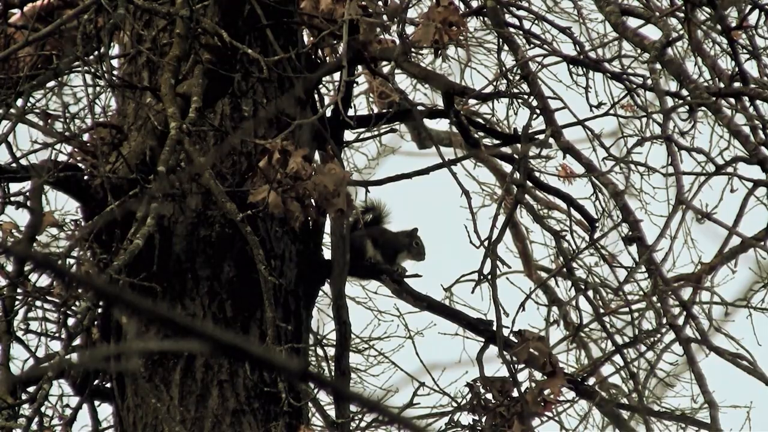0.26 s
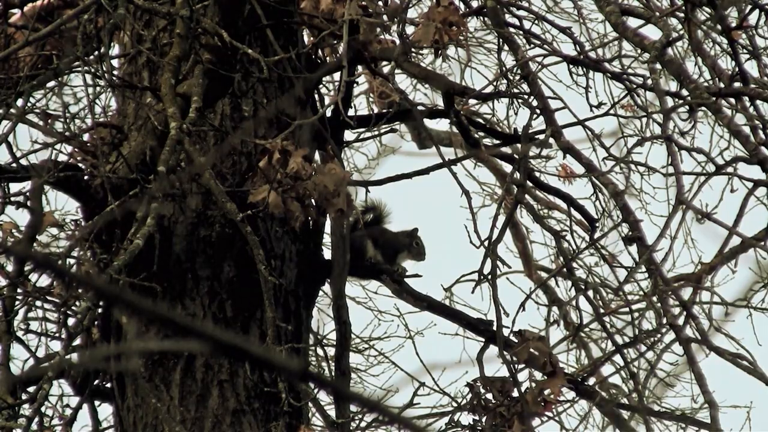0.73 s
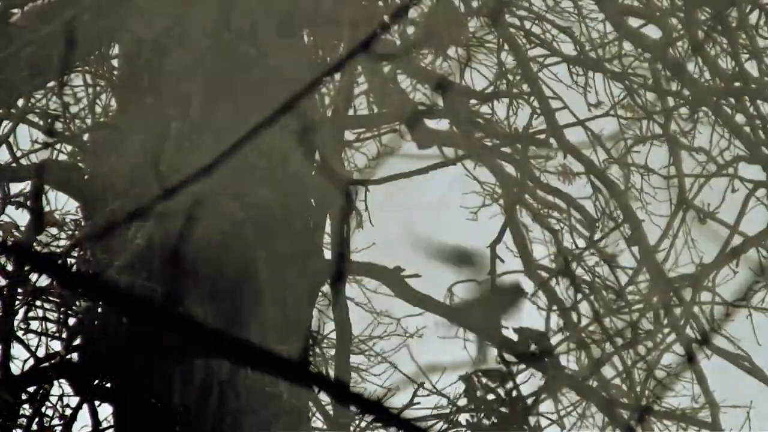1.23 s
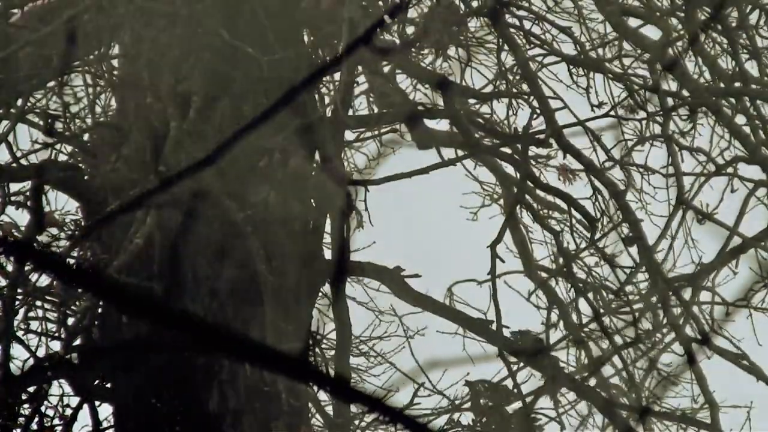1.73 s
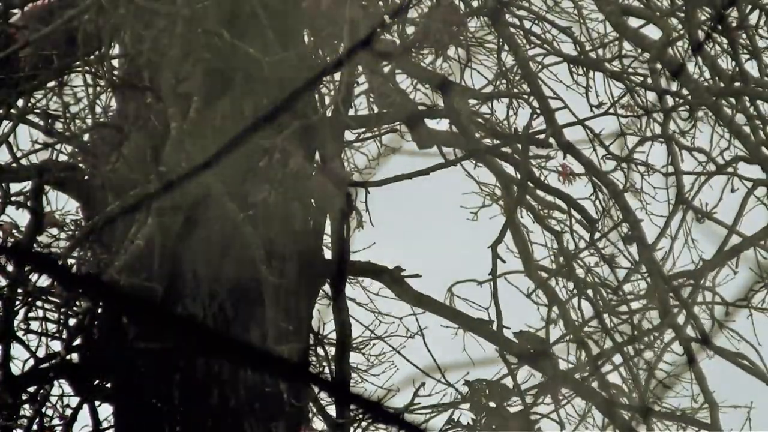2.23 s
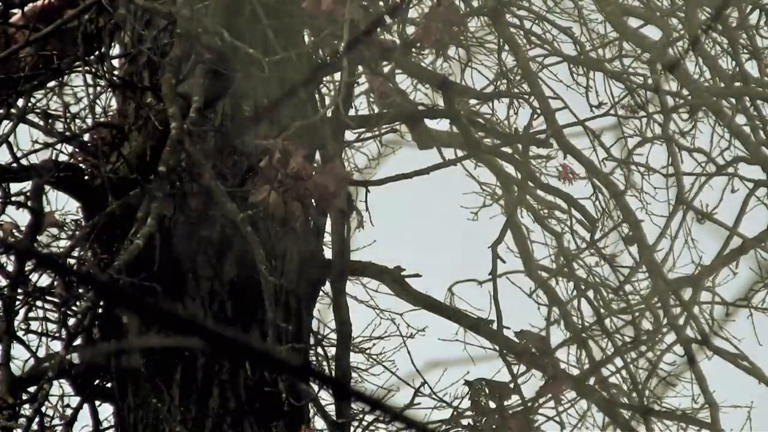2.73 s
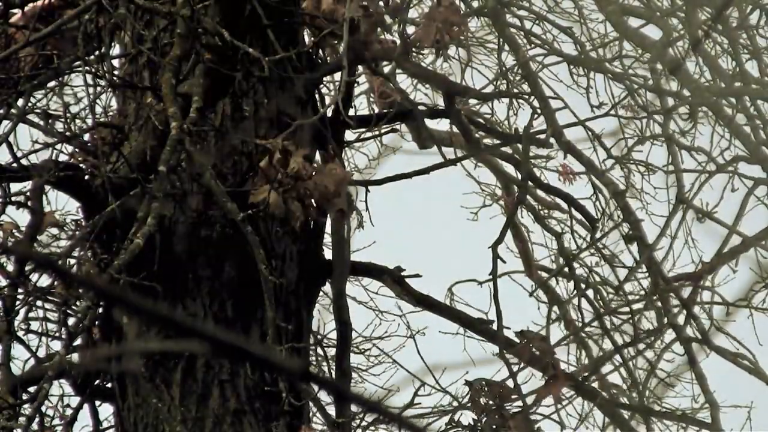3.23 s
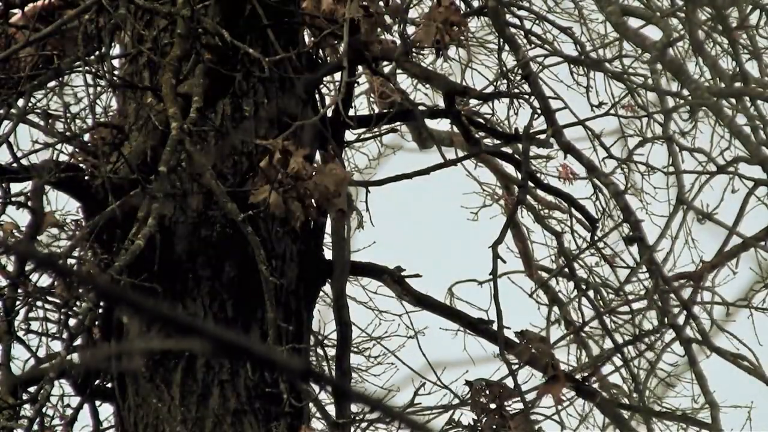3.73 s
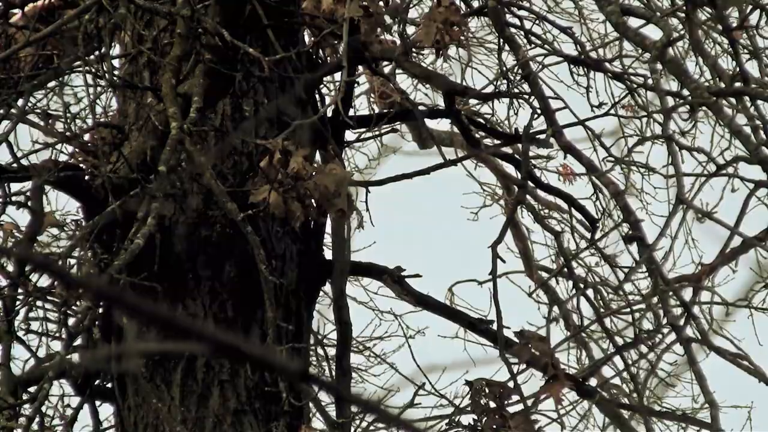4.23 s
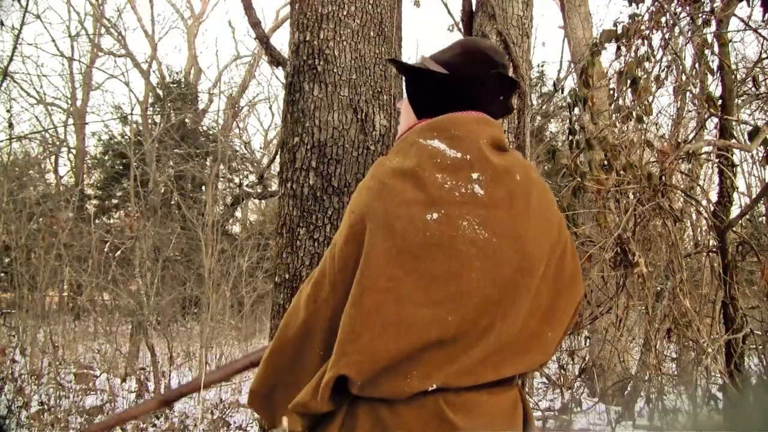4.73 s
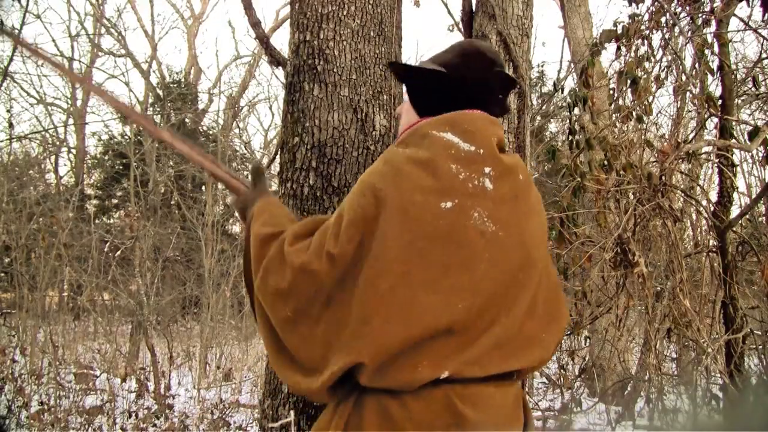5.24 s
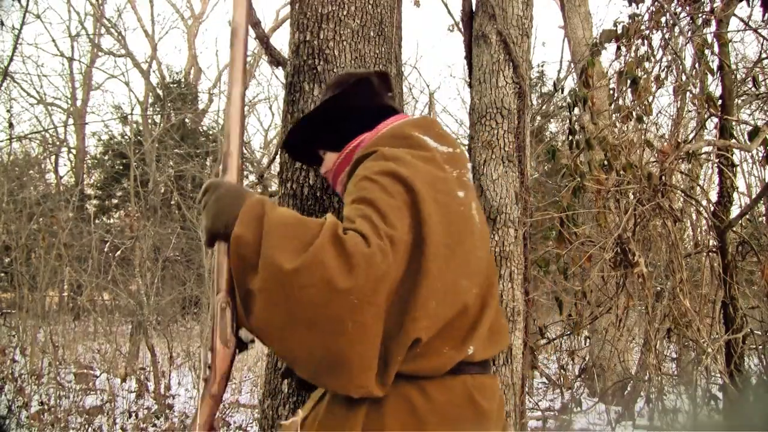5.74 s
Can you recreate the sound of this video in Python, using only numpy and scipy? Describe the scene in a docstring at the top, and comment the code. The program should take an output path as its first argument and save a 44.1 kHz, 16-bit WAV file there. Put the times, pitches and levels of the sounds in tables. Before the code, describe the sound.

Quiet winter woods with a faint low hum. Just before one second a steel flintlock clatters, then a single musket shot cracks, hard enough to overload the close stereo microphone. Trunks throw back quick slaps and a long fading roll. Small bits patter down on leaves and snow, thinning out. Finally the hunter raises the gun: hollow wooden knocks and woollen cloth rubbing.

```python
"""A flintlock musket fires in bare winter woods, heard in stereo from close by.
First there is still air with a wavering hum (shaped noise); then the lock clatters (ringing steel, noise).
The charge bangs (pressure swings and a burst of noise) and trunks send back a long roll (bands of fading ticks).
Shot, bark and twigs patter down on leaves and snow (dense ticks, with single ones standing out).
Later the hunter swings the gun up: the stock knocks (ringing wood), hand and woollen cloak rub (dense ticks)."""
import sys
import numpy as np
from scipy import signal
from scipy.fft import rfft, irfft
from scipy.io import wavfile
from scipy.ndimage import uniform_filter1d

SR = 44100
rng = np.random.default_rng(int(sys.argv[2]) if len(sys.argv) > 2 else 0)


def log_audio(samples):
    """Write samples as a 16-bit WAV file to the path given in sys.argv[1]."""
    # one column per channel
    frames = np.atleast_2d(samples).T
    # limit to full scale, then quantise
    limited = np.clip(frames, -1, 1)
    pcm = np.round(limited * 32767).astype(np.int16)
    wavfile.write(sys.argv[1], SR, pcm)


N = 263686  # length of the scene in samples


def undb(db):
    """Turn dB into a plain gain."""
    return 10 ** (np.asarray(db) / 20)


def unit(x):
    """Scale to an average (RMS) strength of 1."""
    return x / np.sqrt(np.mean(x ** 2))


def peak1(x):
    """Scale to a peak of 1."""
    return x / np.abs(x).max()


def die_away(t, t60):
    """A fade that falls 60 dB in t60 seconds."""
    return np.exp(-np.log(1000) * t / t60)


def at_hz(table, hz):
    """Read a (f/Hz, value) table on a log-frequency axis."""
    f, v = np.transpose(table)
    return np.interp(np.log(hz), np.log(f), v)


def curve(table, off_db=-120):
    """Level column of a (t/s, level/dB) table sample by sample, as good as silent outside it."""
    s, level_db = np.transpose(table)
    return np.interp(np.arange(N) / SR, s, level_db, left=off_db, right=off_db)


def band(x, hz, octaves):
    """Keep only a band of x around hz."""
    edges = hz / 2 ** (octaves / 2), min(hz * 2 ** (octaves / 2), .45 * SR)
    return signal.sosfilt(signal.butter(2, edges, "band", fs=SR, output="sos"), x)


def walk(rate):
    """A random level that glides to a new value rate times a second; spread near 1."""
    k = int(SR / rate)
    steps = np.repeat(rng.standard_normal(N // k + 1), k)
    return unit(uniform_filter1d(steps, k)[:N])


def grains(rate, spread_db):
    """Noise made of separate ticks of unlike sizes, about rate of them a second."""
    hits = rng.random(N) < rate / SR
    sizes = rng.standard_normal(N) * undb(spread_db * rng.exponential(size=N))
    return unit(hits * sizes)


def pair(mid, side, alike):
    """Left and right from two unrelated sounds; likeness 1 is centred, -1 opposed."""
    alike = np.clip(alike, -1, 1)
    return np.sqrt((1 + alike) / 2) * mid + np.sqrt((1 - alike) / 2) * side * np.array([[1], [-1]])


def add(out, s, x, pan_db=0):
    """Mix a short sound in at time s; pan_db is how much louder the left is made."""
    i = int(s * SR)
    x = np.atleast_2d(x)[:, :N - i]
    out[:, i:i + x.shape[1]] += x * undb(np.array([[pan_db], [-pan_db]]) / 2)


def ring(modes, spot_hz, falloff_db, scatter_db, share=0.84, detune=0.01):
    """One blow on a body: notes (modes) far from what the struck spot favours are driven less; peak 1."""
    t = np.arange(SR // 6) / SR
    total = 0
    for hz, db, t60 in modes:
        octaves_away = abs(np.log2(hz / spot_hz))
        gain = undb(db - falloff_db * octaves_away + scatter_db * rng.standard_normal())
        # every mode is detuned a little at random from blow to blow
        shifted_hz = hz * (1 + detune * rng.standard_normal())
        tone = rng.choice([-1, 1]) * np.sin(2 * np.pi * shifted_hz * t)
        total = total + gain * tone * die_away(t, t60 * share)
    return peak1(total)


def fft_hz():
    """Frequencies of the whole scene's spectrum, kept above zero for log reading."""
    return np.maximum(np.fft.rfftfreq(N, 1 / SR), 1)


def colour(x, table):
    """Shape a noise by a (f/Hz, level/dB) table."""
    return unit(irfft(rfft(x) * undb(at_hz(table, fft_hz())), N))


# colour of the quiet woods: (f/Hz, relative level/dB per Hz)
WOODS_COLOUR = [(15, -51), (25, -14.5), (59, -21), (86, -12.5), (164, -13), (193, -11), (260, -9),
                (297, -8.5), (368, -6.5), (523, -7), (567, -6), (2230, -18), (15500, -46)]
WOODS_DB = -59.5
# likeness of left and right in the quiet woods: (f/Hz, likeness)
WOODS_ALIKE = [(60, 0.3), (130, 0.27), (290, -0.31), (640, -0.47), (1410, -0.35), (3100, 0.8), (6820, 0.3),
               (15000, 0.3)]
# slow course of the low hum: (t/s, level/dB)
HUM_LEVEL = [(0, -77), (1.9, -70), (2.2, -91), (3.2, -88), (3.5, -78), (4.5, -83), (5.98, -88)]
HUM_HZ = 89.5


def woods():
    """Still air and far-off rumble are shaped noise; the wavering hum is a narrow band of noise."""
    mid, side = (rfft(colour(rng.standard_normal(N), WOODS_COLOUR)) for _ in range(2))
    air = irfft(pair(mid, side, at_hz(WOODS_ALIKE, fft_hz())), N)
    hum_tone = unit(band(rng.standard_normal(N), HUM_HZ, .25))
    hum = undb(curve(HUM_LEVEL) + 1.5 * walk(2.5)) * hum_tone
    return undb(WOODS_DB + .5 * walk(8)) * air + hum


def rustle(table, spectrum, rate, spread_db, alike, flicker_db):
    """Dense small ticks in many pitch bands; each band flickers in level, and so does the whole."""
    out, power = 0, 0
    for hz in 250 * 2 ** np.arange(0, 6.2, 1 / 3):
        gain = undb(at_hz(spectrum, hz)) * np.sqrt(hz)  # a wider band holds more power
        power += gain ** 2 * (5000 < hz < 11000)  # the level table refers to this range
        mid, side = (unit(band(grains(rate, spread_db), hz, 1 / 3)) for _ in range(2))
        out = out + gain * undb(flicker_db * walk(25)) * pair(mid, side, alike)
    return undb(curve(table) + flicker_db * walk(50)) * out / np.sqrt(power)


# course of the fine patter before the swells: (t/s, level/dB)
PATTER = [(1.3, -59), (1.59, -51), (2.42, -53), (2.64, -48), (2.99, -53.5), (3.4, -56), (3.6, -59.5),
          (3.93, -55.5), (4.25, -60), (4.6, -67.5)]
# colour of the patter as the microphone hears it: (f/Hz, relative level/dB per Hz)
PATTER_COLOUR = [(590, -33), (1000, -8), (1370, 0), (1490, 2), (2480, -8.5), (3630, 1.5), (4830, -13.5),
                 (5780, -1.5), (9300, -1.5), (10600, -1), (12500, -13.5), (16000, -26), (22000, -120)]


def patter():
    """Fine bits landing on leaves, too many to hear one by one."""
    return rustle(PATTER, PATTER_COLOUR, 2500, 2.2, 0.83, 1.54)


# course of the rubbing before the swells: (t/s, level/dB)
RUB = [(4.5, -72), (4.8, -71), (4.948, -61.5), (5.66, -54), (5.804, -57), (5.979, -63.5)]
# colour of the rubbing as the microphone hears it: (f/Hz, relative level/dB per Hz)
RUB_COLOUR = [(150, -46), (250, -16), (402, -7), (749, -7), (1280, -4), (1620, -2), (2640, -16.5),
              (3320, -1.5), (4760, -12.5), (5980, -7), (9940, -3.5), (12500, -13), (16000, -14.5),
              (22000, -120)]


def rub():
    """Hand and woollen cloak rub along the gun as a stream of tiny catches."""
    return rustle(RUB, RUB_COLOUR, 4000, 2.2, 0.98, 1.8)


# showers of crumbs and strokes of cloth, short or long: (t/s, level/dB above the rustle, half-length/s)
SWELLS = [(2.61, 5, 0.028), (3.278, 2.5, 0.059), (3.533, 5, 0.044), (3.83, 7, 0.04), (4.319, 9, 0.035),
          (4.792, 11.5, .015), (5.315, 3, 0.026), (5.417, 6.5, 0.026), (5.649, 11, 0.075),
          (5.939, 10.5, 0.03)]


def swells():
    """Rounded rises in dB, where a shower or stroke makes the rustle stronger."""
    t = np.arange(N) / SR
    return sum(db * np.exp(-((t - s) / half) ** 2 / 2) for s, db, half in SWELLS)


FAINT_S, FAINT_COUNT = (1.8, 5.9), 110  # time span, how many
FAINT_ABOVE_DB, FAINT_HZ = 13, 4700  # middle height above the rustle, middle pitch


def faint_ticks():
    """Faint ticks at random moments, of unlike size and pitch, following the rustle's level."""
    when, size, pitch, crisp = rng.random((FAINT_COUNT, 4)).T
    s = FAINT_S[0] + when * (FAINT_S[1] - FAINT_S[0])
    rustle_db = np.maximum(curve(PATTER), curve(RUB))[(s * SR).astype(int)]
    level_db = rustle_db + FAINT_ABOVE_DB + 4.5 * (size - .5)
    hz = FAINT_HZ * 2 ** (1.4 * (pitch - .5))
    top_db = -6.0 + 17.0 * (crisp - .5)
    return list(zip(s, level_db, hz, top_db))


# the loudest small ticks, bits landing and later handling ticks:
# (t/s, peak level/dB, centre f/Hz, crisp top level/dB)
SMALL_TICKS = [(1.4097, -21, 2160, 1), (1.507, -21, 2120, -3), (1.633, -25.5, 6000, 5),
               (1.657, -19, 2300, -9), (1.7501, -23.5, 1720, -27), (1.8115, -25.5, 4220, -22),
               (1.8504, -29.5, 2270, 7), (1.8879, -20, 2290, -31), (2.0198, -28, 3930, -3),
               (2.0728, -32, 3500, -8), (2.1886, -24, 2640, -8), (2.369, -26.5, 3400, 0),
               (2.447, -25, 3340, 5), (2.4716, -33, 5800, -8), (2.5118, -23, 3980, -13),
               (2.5712, -32, 3880, 10), (2.59, -27, 7000, 8), (2.607, -29, 4200, 9), (2.632, -25, 7000, 8),
               (2.8805, -38, 2790, -5), (2.9029, -34, 3480, -1), (3.0221, -36, 3500, 0),
               (3.0601, -36, 4260, -17), (3.3706, -34.5, 3400, -8), (3.5014, -35, 5000, 7),
               (3.522, -35, 3500, 8), (3.6168, -35, 5000, 10), (3.7904, -34, 6000, 10),
               (3.8168, -36, 3870, -5), (4.285, -35.5, 6200, 0), (4.643, -44.5, 6010, 7),
               (4.7657, -40, 4000, 0), (4.773, -41.5, 6000, 4), (4.852, -41, 5020, 8),
               (5.498, -38, 5980, 8), (5.522, -33, 4000, 3), (5.534, -35, 7000, 6),
               (5.568, -35.5, 2500, -3), (5.957, -39, 2200, 0), (2.825, -33, 5400, -12),
               (2.9653, -28, 5650, 2), (3.121, -25.5, 5600, -13), (3.2233, -28, 2800, 10),
               (3.285, -30, 6560, 10), (3.305, -28, 3470, 2), (3.4096, -30, 6350, 1),
               (3.5516, -33, 6350, 15), (3.714, -34.5, 5430, 13), (3.8505, -30.5, 3800, -18),
               (4.1124, -36, 6100, -13), (4.152, -36, 3700, 1), (4.184, -33, 3440, -17),
               (4.404, -29, 3195, -4), (5.018, -33.5, 3850, 4), (5.761, -32.5, 4090, -2),
               (5.8105, -31, 3600, 2), (5.9146, -30, 4760, 3)]
TICK_BODY_DB, TICK_BODY_SCATTER_DB = -7, 3
TICK_T60_S = 0.037  # typical; it varies from tick to tick


def small_ticks(out):
    """Each small tick has a crisp top and a duller body, then a short noisy tail."""
    t = np.arange(SR // 10) / SR
    for s, db, hz, top_db in list(SMALL_TICKS) + faint_ticks():
        noise = rng.standard_normal((4, len(t)))
        chance = rng.standard_normal(4)
        tail = die_away(t, TICK_T60_S * 1.22 ** chance[0])
        fade = np.exp(-t / 0.0007) + .45 * tail
        top = undb(top_db) * pair(*unit(band(noise[:2], 9000, .6)), .85)
        body_db = TICK_BODY_DB + TICK_BODY_SCATTER_DB * chance[1]
        body = undb(body_db) * unit(band(noise[3], 1400 * 1.2 ** chance[2], 1.1))
        centre = unit(band(noise[2], hz, 0.8))
        upper = undb(-8.0) * unit(band(noise[1], min(1.87 * hz, 12000), .6))
        tick = (centre + upper + top + body) * fade
        onset = 1 - np.exp(-t / 0.00034)
        add(out, s, undb(db) * peak1(tick * onset), pan_db=1.5 * chance[3] - 1)


# knocks: (t/s, peak level/dB, share of ring time, f/Hz the struck spot favours, loss/dB per octave from it)
KNOCKS = [(4.412, -51, 1.6, 690, 26), (5.066, -27.5, 1.2, 1120, 12), (5.075, -30, 1.7, 1120, 11),
          (5.083, -33.5, 1.3, 900, 10), (5.096, -35, 0.3, 1100, 7), (5.115, -19, 1.23, 1090, 5),
          (5.141, -26, 0.6, 1000, 6), (5.149, -34, 1.2, 800, 5), (5.159, -35.5, 1.3, 600, 10),
          (5.172, -38, 1.4, 550, 8), (5.227, -42, .3, 800, 8), (5.234, -43, 1.6, 705, 30),
          (5.302, -35.5, 0.23, 800, 5), (5.323, -28.5, 0.1, 1090, 13), (5.375, -32, 0.57, 450, 5),
          (5.473, -26, 0.32, 1090, 11)]
# ringing notes of the wooden stock: (f/Hz, relative level/dB, time to fall 60 dB/s before the share)
STOCK_MODES = [(315, 2, 0.025), (450, 3, 0.025), (573, -4.5, 0.061), (705, -8.5, 0.055), (926, 0.5, 0.028),
               (1091, 3.5, 0.026), (1164, 2.5, 0.042), (1550, -2.5, 0.025), (1970, -3.5, 0.031),
               (3030, 1.5, 0.026), (3500, -0.5, 0.014), (4600, -6, 0.012), (6350, 4.5, 0.016)]
KNOCK_CLACK_DB, KNOCK_CLACK_S = -12, 0.0035
KNOCK_TICK_DB, KNOCK_TICK_S = -13, 0.0016  # the loss per octave lowers the tick further


def knocks(out):
    """Wood and ramrod bump: a sharp tick and a dry clack, then the stock rings."""
    t = np.arange(SR // 6) / SR
    for s, db, share, spot_hz, falloff_db in KNOCKS:
        noise = rng.standard_normal((2, len(t)))
        clack = unit(band(noise[0], spot_hz, 1.6)) * np.exp(-t / KNOCK_CLACK_S)
        tick = unit(band(noise[1], 4800, 1.5)) * np.exp(-t / KNOCK_TICK_S)
        wood = ring(STOCK_MODES, spot_hz, falloff_db, 2, share, detune=.012)
        wood = wood + undb(KNOCK_CLACK_DB) * clack
        # a blow that wakes few modes is soft and ticks less
        wood = wood + undb(KNOCK_TICK_DB - falloff_db) * tick
        onset = 1 - np.exp(-t / 0.00043)
        add(out, s, undb(db) * peak1(band(wood * onset, 1300, 6.1)), pan_db=-0.8)


# strong single echoes off near trunks: (t/s, peak level/dB, centre f/Hz, likeness of left and right)
SLAPS = [(0.8802, -5.5, 500, -0.86), (0.888, -7.5, 460.6, -1.04), (.913, -4.5, 596, .8),
         (.912, -18, 140, 0.96), (1, -22, 190, 1), (1.032, -14.5, 370, 0.94), (1.11, -31.5, 120, 1),
         (1.22, -33, 75, 1), (.94, -9.5, 790, .8), (.965, -10.5, 1280, .8), (1.035, -17, 1400, 0.7),
         (1.129, -15, 700, .8), (1.224, -25, 850, .8)]


def slaps(out):
    """Near trunks throw back single echoes: short bursts of noise that rise and fade."""
    t = np.arange(SR // 10) / SR
    for s, db, hz, alike in SLAPS:
        noise = band(rng.standard_normal((2, len(t))), hz, 2.0)
        fade_s = 0.0028 * np.sqrt(700 / hz)  # low echoes last longer
        add(out, s, undb(db) * peak1(pair(*noise, alike) * t * np.exp(-t / fade_s)))


# the roll of echoes, with a last return from far off: (t/s, level/dB)
ROLL = [(.879, -39), (.884, -18.5), (1.03, -20), (1.075, -21.5), (1.14, -19), (1.31, -26), (1.43, -26.5),
        (1.94, -44), (2.4, -53), (3.25, -67), (3.68, -63), (4.3, -71.5)]
# colour at the start of the roll: (f/Hz, relative level/dB per Hz)
ROLL_COLOUR = [(24, -55), (40, -30.5), (136, -15.5), (280, -12.5), (480, -6.5), (800, -7.5), (1280, -4),
               (1960, -17), (2600, -15), (3300, -15), (4570, -23.5), (6500, -20), (9500, -21), (15500, -44)]
# how much faster than the middle each band dies at first; deep bass and treble go soonest:
# (f/Hz, loss/dB per s)
ROLL_LOSS = [(40, 21), (150, 40.5), (300, 0), (600, -5.5), (1200, 4), (2200, 8.5), (3300, 15), (5000, 29.5),
             (12000, 39)]
# likeness of left and right at the start of the roll: (f/Hz, likeness)
ROLL_ALIKE = [(60, 0.86), (130, 1), (290, 1), (640, 0.95), (1410, 0.83), (3100, 0.69), (6820, 0.58),
              (15000, -0.39)]
ROLL_SETTLE_S = 1.8  # after this long the colour changes little more
ROLL_SPREAD_S = 9  # late echoes come from all around, so the sides grow unlike


def roll():
    """Many trunks return the report; later echoes have travelled further and lost their edges."""
    age = np.maximum(np.arange(N) / SR - ROLL[0][0], 0)
    wear = ROLL_SETTLE_S * np.tanh(age / ROLL_SETTLE_S)
    lumps_db = .9 * walk(29.8)  # shared by all bands
    out, power = 0, 0
    for hz in 45 * 2 ** np.arange(0, 8.5, .5):
        mid, side = (unit(band(grains(6000, 0.67), hz, 0.57)) for _ in range(2))
        start_db = at_hz(ROLL_COLOUR, hz) + 10 * np.log10(hz)  # a wider band holds more power
        power += undb(2 * start_db) * (350 < hz < 1400)  # the level table refers to this range
        band_db = start_db - at_hz(ROLL_LOSS, hz) * wear + lumps_db + 1.0 * walk(12)
        alike = at_hz(ROLL_ALIKE, hz) * np.exp(-age / ROLL_SPREAD_S)
        out = out + undb(band_db) * pair(mid, side, alike)
    out = out / np.sqrt(power) * undb(curve(ROLL))
    slaps(out)
    return out


# flint, frizzen and springs striking: (t/s, level/dB, f/Hz the struck part favours, spark tick level/dB)
LOCK_BLOWS = [(0.776, -9, 1578, -4), (0.7787, -8, 1200, -18.5), (0.7847, 1.5, 1282, -18.5),
              (0.7854, -1, 2315, -23.5), (0.791, -7.5, 1200, -13), (0.7944, -1.5, 1490, -14.5),
              (0.797, -2, 2400, -19), (0.8032, -12, 2600, -19.5), (0.8224, -12.5, 2493, -17.5),
              (0.8355, -14.5, 2535, -18), (.8435, -21, 1870, -22)]
# ringing notes of the steel lock: (f/Hz, relative level/dB, time to fall 60 dB/s before ring's share)
LOCK_MODES = [(580, -4.5, 0.01), (995, -7, 0.018), (1347, -5.5, 0.025), (1580, -7.5, 0.02),
              (2505, -3.5, 0.021), (2940, -4, 0.014), (3760, -17.5, 0.0088), (5530, -24.5, 0.0062),
              (6780, -26, .008), (9480, -28, 0.0043)]
LOCK_CRACK_DB, LOCK_CRACK_T60_S = -6, .013
LOCK_TAIL_DB, LOCK_TAIL_T60_S = -21, .17  # scatter off the stock and ground
SCRAPE_S, SCRAPE_DB, SCRAPE_HZ = (.777, .803), -20.5, 1700  # start and end, level, centre


def lock(out):
    """The flint scrapes down the steel; each blow rings the lock and scatters off the stock and ground."""
    t = np.arange(SR // 6) / SR
    contact = 1 - np.exp(-t / 0.00045)  # the flint bites over a moment
    scrape = band(rng.standard_normal(int((SCRAPE_S[1] - SCRAPE_S[0]) * SR)), SCRAPE_HZ, 1.5)
    add(out, SCRAPE_S[0], undb(SCRAPE_DB) * unit(scrape) * signal.windows.tukey(len(scrape), .5))
    for s, db, spot_hz, tick_db in LOCK_BLOWS:
        noise = rng.standard_normal((5, len(t)))
        crack = unit(band(noise[0], spot_hz, 1.5)) * die_away(t, LOCK_CRACK_T60_S)
        tick = unit(band(noise[1:3], 8500, 1.5)) * np.exp(-t / 0.00097)
        steel = ring(LOCK_MODES, spot_hz, 6.3, 1.7) + undb(LOCK_CRACK_DB) * crack
        add(out, s, undb(db) * contact * (steel + undb(tick_db) * pair(*tick, -0.22)))
        tail = band(noise[3:], 1500, 2.9) * die_away(t, LOCK_TAIL_T60_S)
        add(out, s, undb(db + LOCK_TAIL_DB) * pair(*tail, 0.83))


# muzzle pressure swings (a dip, then a spike) and the ground bounce: (middle t/s, peak level/dB, length/s)
BLAST = [(0.878, -6.5, 0.0023), (0.88, 8.5, 0.00099), (0.8844, -8, 0.0035)]
GAS_S, GAS_DB, GAS_RISE_S, GAS_FALL_S = .8788, -5.5, 0.0016, .0015


def blast(out):
    """Pressure swings at the muzzle inside a burst of jetting gas."""
    for (s, db, length), sign in zip(BLAST, (-1, 1, 1)):
        add(out, s - length / 2, sign * undb(db) * np.hanning(int(length * SR)))
    t = np.arange(N) / SR - GAS_S
    # the charge is already roaring up the barrel
    lead = (t < 0) * np.exp(-abs(t) / 0.0065)
    out += undb(-17.5) * lead * unit(band(rng.standard_normal(N), 600, 1.7))
    swell = np.exp(np.where(t < 0, t / GAS_RISE_S, -t / GAS_FALL_S))
    roar, hiss = (unit(band(rng.standard_normal((2, N)), hz, 1.5)) for hz in (1500, 8000))
    gas = pair(*roar, .7) + undb(-5.0) * pair(*hiss, -0.23)
    out += undb(GAS_DB) * swell * gas


RUSTLE_RIGHT_DB = 0.2  # how much louder the rustle is made on the right


def scene():
    """Lay the patter and rubbing, the roll and the single events over the quiet woods."""
    side_db = np.array([[-RUSTLE_RIGHT_DB], [RUSTLE_RIGHT_DB]]) / 2
    out = woods() + undb(swells() + side_db) * (patter() + rub()) + roll()
    for source in small_ticks, knocks, lock, blast:
        source(out)
    return out


MIC_LOW_HZ, MIC_HIGH_HZ, TOP_HZ = 88, 12300, 15700


def record(dry):
    """The microphone thins bass and top; the recorder clips the loudest peaks and cuts the top."""
    mic = signal.sosfilt(signal.butter(1, MIC_LOW_HZ, "high", fs=SR, output="sos"), dry)
    mic = signal.sosfilt(signal.butter(2, MIC_HIGH_HZ, fs=SR, output="sos"), mic)
    clipped = np.clip(mic, -1, 1)
    top_cut = signal.ellip(8, .2, 60, TOP_HZ, fs=SR, output="sos")
    return np.clip(signal.sosfilt(top_cut, clipped), -1, 1)


dry = scene()
out = record(dry)
log_audio(out)
```